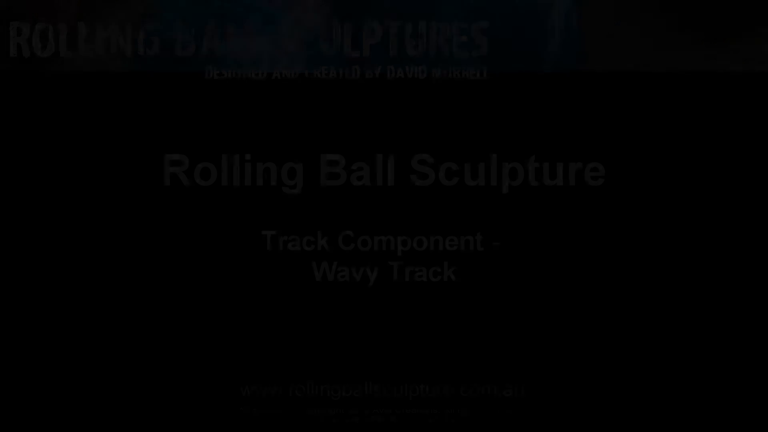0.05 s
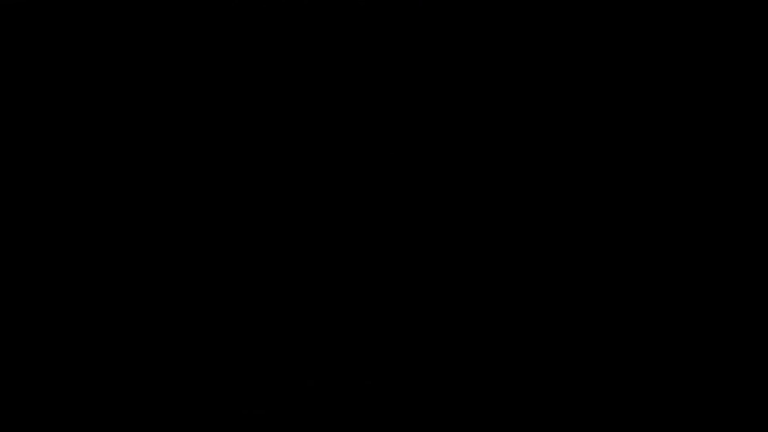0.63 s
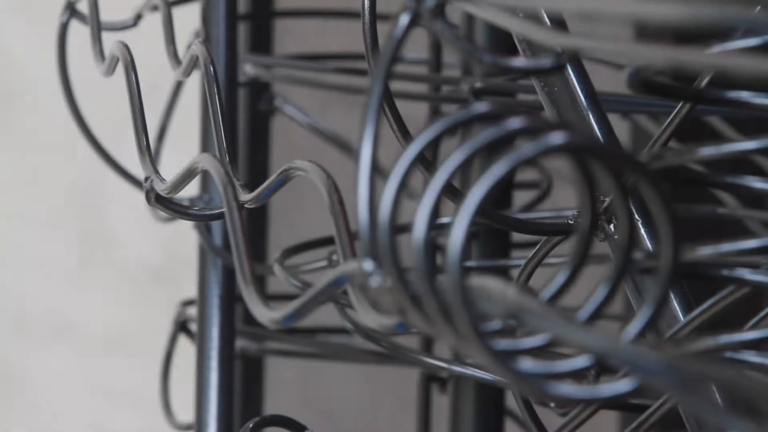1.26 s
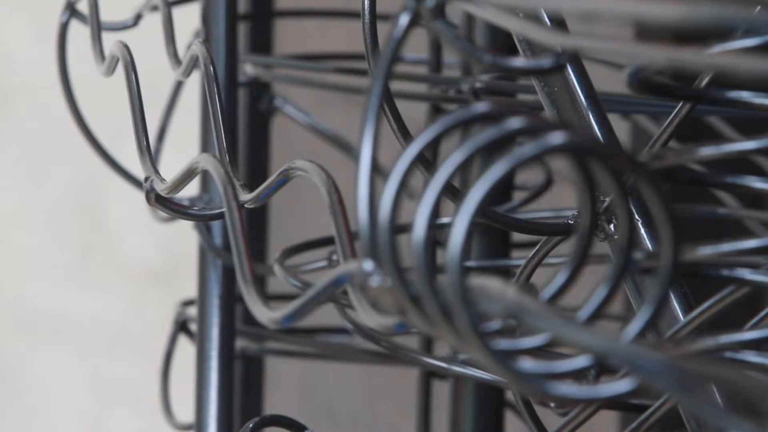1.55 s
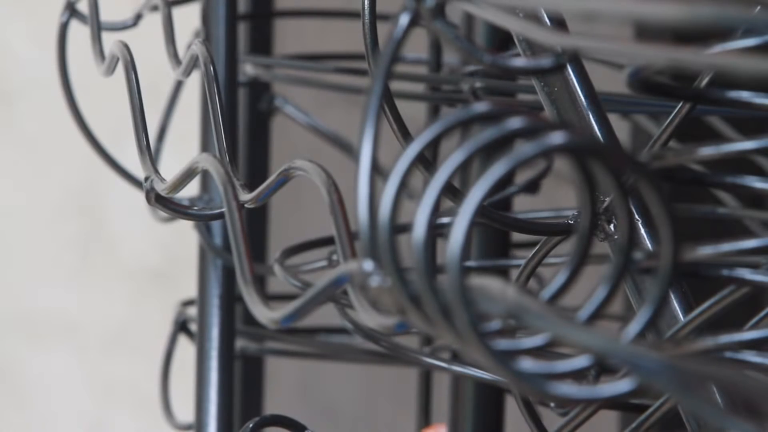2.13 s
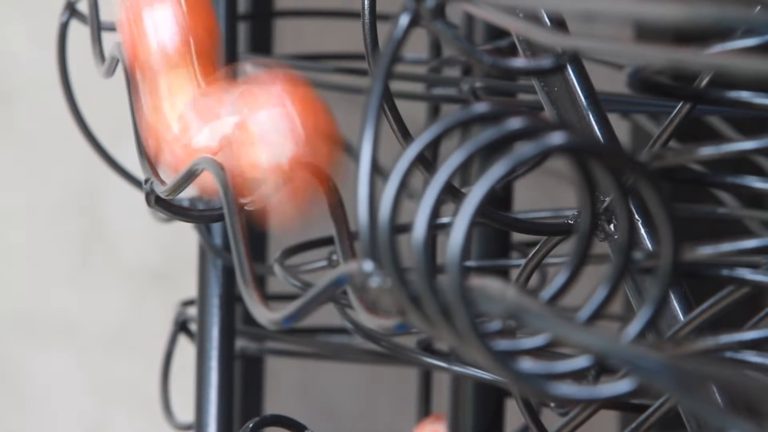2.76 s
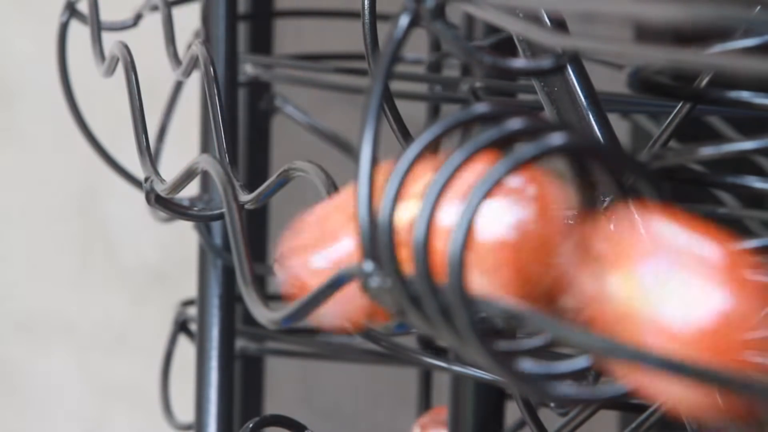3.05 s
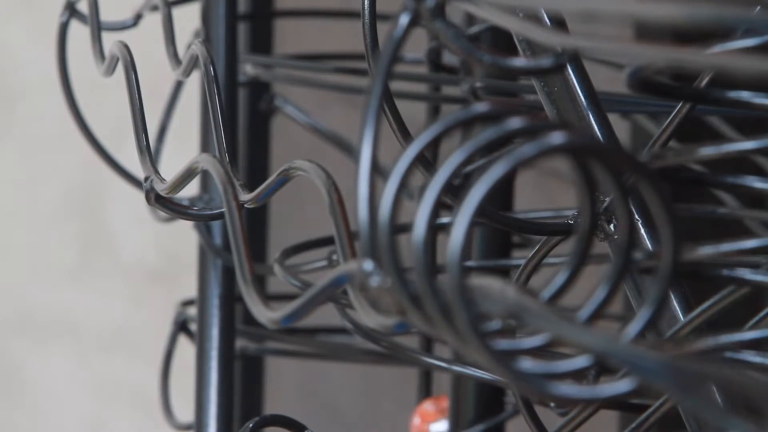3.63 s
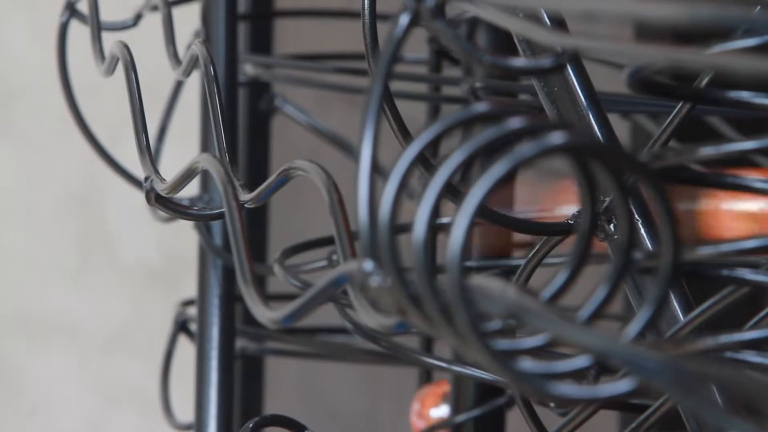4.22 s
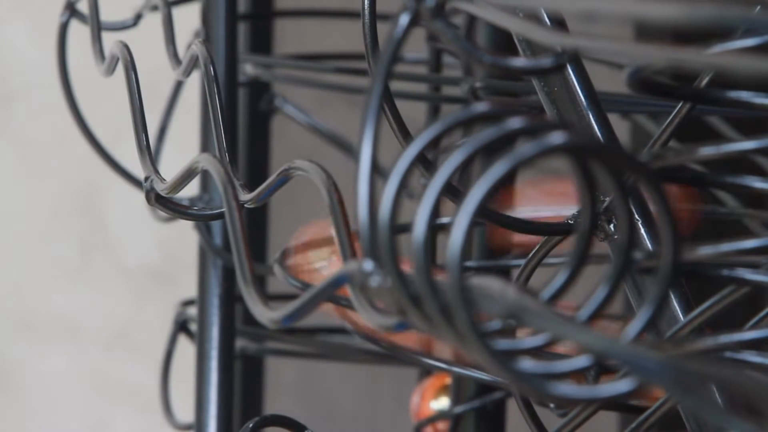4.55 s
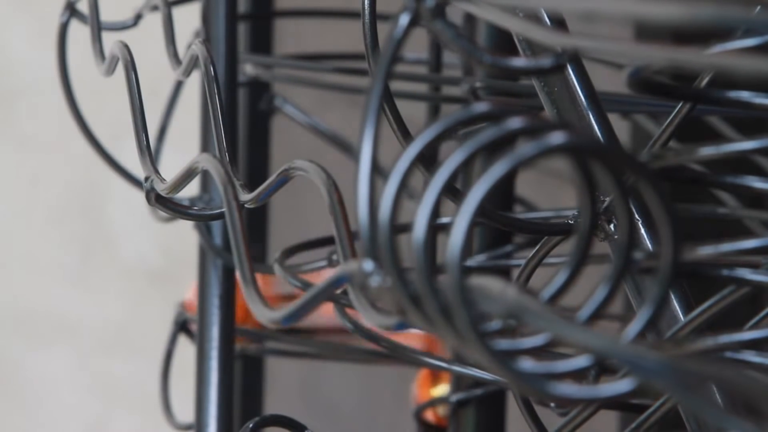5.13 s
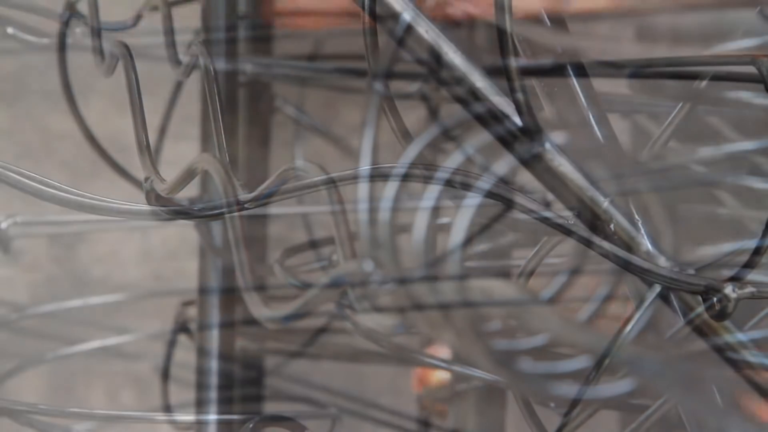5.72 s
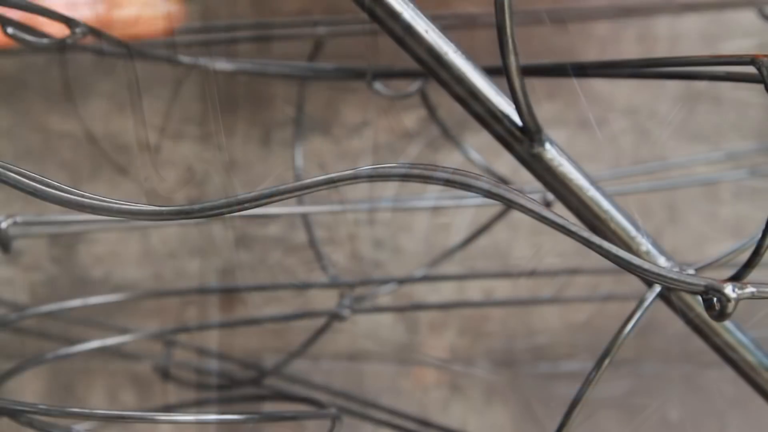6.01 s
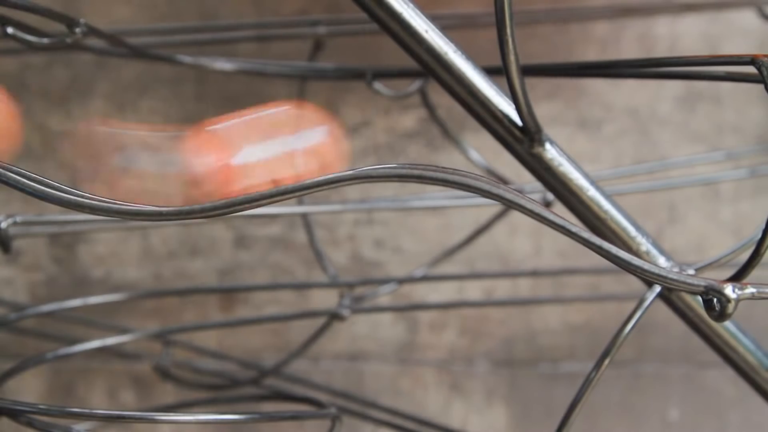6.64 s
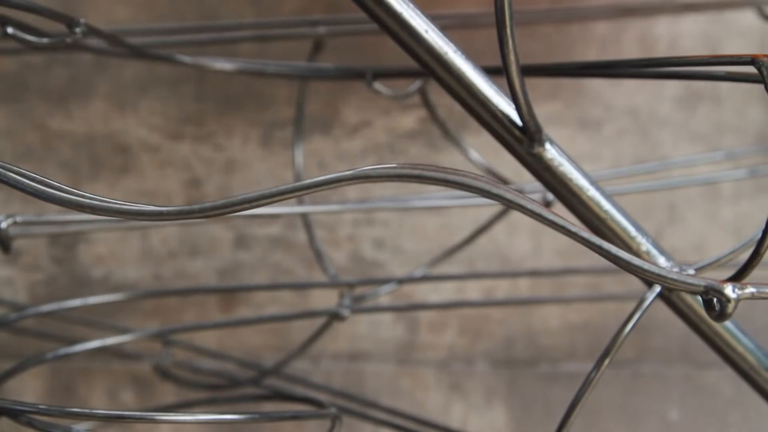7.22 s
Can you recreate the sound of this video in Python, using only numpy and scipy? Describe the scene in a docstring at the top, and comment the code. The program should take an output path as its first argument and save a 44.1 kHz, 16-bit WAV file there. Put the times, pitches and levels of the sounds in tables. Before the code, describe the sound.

Close, continuous metallic rolling of balls on wire rails, broken by buzzy rattles, a sharp clack and light ticks, ending with a low rumble.

```python
"""Beside a welded rolling-ball sculpture, one microphone close to its wire tracks. Balls roll down, and pits in
the wire shake the rails into a ringing hiss that brightens with speed. At joints and bends the balls chatter.
One hard clack, a few ticks and two small pings stand out. Late in the run the scene changes, crossfading to a
wavy stretch of track where the frame rumbles."""
import sys
import numpy as np
from scipy import signal
from scipy.fft import rfft, irfft
from scipy.io import wavfile
from scipy.ndimage import uniform_filter1d

SR = 44100
rng = np.random.default_rng(int(sys.argv[2]) if len(sys.argv) > 2 else 0)


def output_pcm(signal):
    """Save a mono or channel-first signal as 16-bit PCM at the path in sys.argv[1].

    Samples are clipped to [-1, 1] before scaling.
    """
    pcm = np.clip(np.atleast_2d(signal).T, -1, 1) * 32767
    wavfile.write(sys.argv[1], SR, np.round(pcm).astype(np.int16))


N = 329427
TIME = np.arange(N) / SR
START_S = 0.192
CROSSFADE_S = [5.38, 6.05]  # the scene changes from the first stretch of track to the wavy one


def amp(db):
    """Decibels to gain."""
    return 10 ** (np.asarray(db) / 20)


def unit(x):
    """Scales to rms 1."""
    return x / np.sqrt(np.mean(x ** 2) + 1e-20)


def log_interp(hz, knots, values):
    """Joins spectrum points on a log-frequency axis."""
    return np.interp(np.log(hz + 1), np.log(knots), values)


def add(mix, start_s, sound):
    """Mixes a sound in at start_s."""
    part = mix[round(start_s * SR):][:len(sound)]
    part += sound[:len(part)]


def tint(x, knots, levels_db, peaks=(), size=8192):
    """Causal filter from a smooth spectrum plus resonance peaks (Hz, width in Hz, dB)."""
    hz = abs(np.fft.fftfreq(size, 1 / SR))
    peaks_db = sum(db / (1 + (2 * (hz - centre) / width) ** 2) for centre, width, db in peaks)
    gain = amp(log_interp(hz, knots, levels_db) + peaks_db)
    minimum_phase = np.exp(np.conj(signal.hilbert(np.log(gain))))
    response = np.fft.ifft(minimum_phase).real
    return signal.oaconvolve(x, response[:size // 2])[:len(x)]


def band_db(x, lo_hz, hi_hz):
    """Rms level of one band."""
    hz = np.fft.rfftfreq(len(x), 1 / SR)
    band = rfft(x)[(hz > lo_hz) & (hz < hi_hz)]
    return 10 * np.log10(2 * np.sum(abs(band) ** 2) / len(x) ** 2)


def wander(per_s):
    """Random drift of rms 1 that takes a new value per_s times a second."""
    return unit(np.interp(TIME * per_s, np.arange(4096), rng.standard_normal(4096)))


def swell(t, at_s, spread_s):
    """A smooth bump of height 1."""
    return np.exp(-((t - at_s) / spread_s) ** 2)


def pits(per_s, spread_db, rubbing):
    """Contact force: tiny blows of uneven size over a smooth rubbing noise."""
    sizes = amp(spread_db * np.minimum(rng.exponential(1, N), 4))
    blows = sizes * rng.choice([-1, 1], N) * (rng.random(N) < per_s / SR)
    return unit(unit(blows) + rubbing * rng.standard_normal(N))


def wire_web(x, wet_db, t60, above_hz, size=16384):
    """Waves run on through the welded wires and come back as a thicket of fine, high modes."""
    t, hz = np.arange(size) / SR, np.fft.rfftfreq(size, 1 / SR)
    tail = rng.standard_normal(size) * amp(-60 * t / t60)
    wet = amp(wet_db) * hz ** 4 / (hz ** 4 + above_hz ** 4)
    response = irfft((1 + wet * rfft(tail / np.linalg.norm(tail))) / np.sqrt(1 + wet ** 2))
    lead = size // 64  # room for the filter's pre-ring
    return signal.oaconvolve(x, np.roll(response, lead))[lead:lead + N]


def ring(modes):
    """Struck modes dying away."""
    t = np.arange(SR) / SR
    return sum(amp(db - 60 * t / t60) * np.sin(2 * np.pi * hz * t) for hz, db, t60 in modes)


def frame_rumble():
    """Balls swinging through the wavy stretch shake the whole frame."""
    # The rumble's rise and fall. Each row: time in seconds, level in dB.
    levels = [(5.3, -62), (5.55, -39), (5.95, -29), (6.26, -37.5), (6.39, -33), (6.75, -30.5), (7.02, -33),
              (7.32, -44.5), (7.46, -37)]
    # The frame's low response. Each row: frequency in Hz, relative level in dB.
    colour = [(30, -37), (60, -36), (90, -21), (130, -4.5), (160, -2.5), (235, -4.5), (265, -1.5), (284, 5),
              (305, -12.5), (450, -8.5), (1000, -77)]
    force = pits(per_s=370, spread_db=-3.0, rubbing=0.45)
    shake = unit(tint(force, *np.transpose(colour)))
    return shake * amp(np.interp(TIME, *np.transpose(levels), left=-100))


def knocks():
    """Ball on ball cracks and rings; a ball on a short bar or a thin wire end only pings."""
    # Ball strikes ball. Each row: start in seconds, gain in dB, further gain of thud and ring in dB.
    clacks = [(0.4778, 2.5, -0.5), (0.6165, -12.5, -22), (1.5575, -7, -28), (2.9375, -5, -34),
              (3.190, -10, -32)]
    # Struck modes. Each row: frequency in Hz, relative level in dB, t60 in seconds.
    crack_modes = [(3900, -12, 0.005), (5670, 2.5, 0.003), (8700, -19, .018), (11100, -20, .012)]  # the brief crack itself
    body_modes = [(700, -10, .003), (2720, -44, .5), (5841, -28, 0.32), (8726, -21, 0.26),
                  (10420, -26, .16), (11100, -16.5, 0.28), (11800, -25, 0.36), (14500, -31, .5)]  # a dead thud and thin rings
    bar_modes = [(921, -5, .2), (1911, 0, .25), (5685, -5, .1), (9600, -6, .08), (10260, -9, .12)]
    wire_modes = [(6700, -4, .14), (9150, -1, .22), (9781, -6, .3), (14430, -3, .18)]
    out, t = np.zeros(N), np.arange(SR) / SR
    # The crack scatters along the wire as a short, bright spray.
    spray = unit(tint(rng.standard_normal(SR), [800, 4000, 12000, 16000], [-29, 0, 1, -10]))
    spray *= amp(-14.0 - 60 * t / 0.049)
    for start_s, db, body_db in clacks:
        add(out, start_s, amp(db) * (ring(crack_modes) + spray + amp(body_db) * ring(body_modes)))
    attack = np.minimum(t / 0.0014, 1)
    for start_s, db, modes in [(4.983, -14, bar_modes), (6.334, -21, wire_modes)]:
        add(out, start_s, amp(db) * ring(modes) * attack)
    return out


def chatter():
    """A ball jolted at a joint or bend bounces in a fast buzz of tiny blows, then settles."""
    # The jolts. Each row: start in seconds, level in dB, hold and t60 in seconds, bright share 0-1.
    jolts = [(0.365, -30.5, 0.03, .3, .4), (0.434, -23.5, .013, 0.12, 0.7), (0.479, -21, .006, 0.76, 0.54),
             (0.699, -17.5, 0.037, .21, 0.88), (0.752, -15.5, .02, 0.28, 0.93),
             (0.795, -18, 0.023, 0.21, 0.5), (0.86, -19.5, 0.13, .3, .4), (1.110, -23, .02, .38, .75),
             (1.344, -25.5, 0.036, .4, 0.36), (1.510, -21.5, .035, .3, 0.84),
             (1.55, -13.5, 0.006, 0.06, .3), (1.556, -15, .005, 0.43, 1), (1.656, -17.5, 0.018, .44, .87),
             (1.73, -22, .02, .12, .7), (1.838, -14, .018, 0.24, 0.8), (2.486, -19, .025, 0.5, .43),
             (2.848, -22.5, 0.051, 0.27, 0.4), (3.178, -24.5, 0.027, 0.3, .4), (3.580, -29, .02, .24, .5),
             (4.48, -21, 0.096, .2, 0.6), (4.821, -16, 0.014, .3, 0.7), (4.865, -21.5, .015, .2, .8),
             (4.913, -23, .02, 0.33, 0.7), (4.982, -16.5, 0.015, .17, 1), (5.07, -17, .022, .6, 1),
             (5.339, -20.5, .018, 0.31, .5), (5.550, -23.5, .076, .3, .4), (6.165, -19.5, .07, 0.18, .2),
             (6.435, -22.5, 0.043, .2, 0.5), (6.76, -26, .012, .2, .5), (6.825, -21.5, .04, .3, 0.3),
             (6.944, -16.5, 0.033, 0.46, 0.53), (7.063, -18.5, 0.051, .25, 0.5),
             (7.160, -21, 0.1, .2, 0.45)]
    # Soft and hard contact. Each row: frequency in Hz, dull and bright relative levels in dB.
    colours = [(100, -42, -46), (700, -9, -15), (1980, -11, -19), (4330, -1.5, -9.5), (8040, -1.5, -13),
               (10300, -2, -5.5), (11500, -16, -0.5), (14300, -25, -4.5), (16700, -30, -23)]
    dull_power, bright_power = np.zeros(N), np.zeros(N)
    t = np.arange(SR // 2) / SR
    for start_s, db, hold_s, t60, bright in jolts:
        attack = np.minimum(t / (0.058 * hold_s), 1)
        power = (attack * amp(db - 60 * np.maximum(t - hold_s, 0) / t60)) ** 2
        add(dull_power, start_s, power * (1 - bright))
        add(bright_power, start_s, power * bright)
    knots, dull_db, bright_db = np.transpose(colours)
    buzz = np.zeros(N)
    for power, colour_db in [(dull_power, dull_db), (bright_power, bright_db)]:
        force = pits(per_s=3000, spread_db=2.0, rubbing=0.66)
        force = wire_web(force, wet_db=-3, t60=0.11, above_hz=1100)
        buzz += np.sqrt(power) * unit(tint(force, knots, colour_db))
    return buzz


def ringing_rails():
    """Pits in the wire ring the rails and their frame; the scene then changes from the first stretch to the
    wavy one."""
    # The track's tone. Each row: frequency in Hz, relative dB on the first and on the wavy stretch.
    colours = [(30.0, -40, -39), (80.0, -31, -29), (156, -26, -13), (247, -26.5, -25), (374, -23.5, -26),
               (687, -13.5, -17.5), (1214, -5, -7), (2250, -3.0, 0), (3050, -1, -7), (4780, 0.5, -3.5),
               (7400, -3, -5.5), (12000.0, -4, -8.5), (13900, -10, -13), (15300, -17.5, -18.0)]
    # Resonances of the frame and of each stretch. Each row: centre in Hz, width in Hz, lift in dB.
    frame_modes = [(365, 130, 13), (508, 100, 13), (605, 70, 14.5), (775, 45, 6.5), (918, 105, 9.5)]
    first_modes = [(1063, 59, 6.5), (1280, 183, 10.5), (1520, 145, 6), (1681, 204, 9), (1852, 15, 8),
                   (1922, 42, 12), (2032, 144, 11.5), (2150, 116, 4), (2299, 73, 8), (2378, 24, 10),
                   (2527, 39, 6), (2577, 93, 6.5), (2690, 5.4, 5), (2738, 9, 15.5), (2836, 22, 3.5),
                   (3010, 390, 3), (3533, 120, 4.5), (3930, 26.0, -2), (4000, 82, 6), (4290, 92, 6.5),
                   (4500, 35, -1), (5723, 68, 7), (6370, 64, 5.5), (8630, 20.0, 8), (9450, 85, 7.5)]
    wavy_modes = [(1073, 87, 6), (1237, 146, 8.5), (1600, 60, 6.5), (1968, 19, 9), (2082, 193, 9.5),
                  (2425, 125, 7), (2620, 160, 4.5), (2780, 28, 8.5), (3030, 33, 9), (3340, 170, 8),
                  (3600, 140, 6.5), (3860, 150.0, 3), (4250, 230, 6), (4280, 30.0, -2), (4740, 95, 3),
                  (4770, 27.0, 3), (5530, 38.0, 0), (5615.0, 19, 12.5), (6140, 27, 0), (6170, 22.0, 9),
                  (8830, 150.0, 7.5), (9800, 150.0, 5), (10100, 24.0, 3), (10901.0, 18, 3),
                  (11160, 104.0, 8)]
    force = pits(per_s=2600, spread_db=1.5, rubbing=0.73) * amp(0.4 * wander(per_s=45))
    force = wire_web(force, wet_db=-3, t60=.5, above_hz=3400)
    knots, first_db, wavy_db = np.transpose(colours)
    first = unit(tint(force, knots, first_db, [*frame_modes, *first_modes]))
    wavy = unit(tint(force, knots, wavy_db, [*frame_modes, *wavy_modes]))
    wavy_share = np.interp(TIME, CROSSFADE_S, [0, 1])
    return (1 - wavy_share) * first + wavy_share * wavy


def resonance_drift_db(hz, t):
    """Lift by frequency and time: two rings of the wire and the frame's hum change along the run."""
    def band(centre_hz, half_width_hz, lift_db):
        return np.outer(1 / (1 + ((hz - centre_hz) / half_width_hz) ** 2), lift_db)

    # The main ring is weak at the top of the track and fills in as the balls run down.
    main_db = np.interp(t, CROSSFADE_S, [1, 0.6]) - 8 * np.exp(-(t - START_S) / 0.75)
    # The higher ring swells once, through the bends and the coil; the hum sinks in mid-run.
    coil_db = np.interp(t, CROSSFADE_S, [-1.05, .7]) + 4.5 * swell(t, at_s=2.4, spread_s=0.88)
    hum_db = 1.5 - 3 * swell(t, at_s=3.4, spread_s=1.7)
    return band(2030, 116, main_db) + band(4530, 380, coil_db) + band(490, 180, hum_db)


def rolling():
    """Balls run down the rails; a faster, harder contact is louder and tilts the hiss upwards."""
    # Speed over the slopes, given as how loudly the rails ring. Each row: time in seconds, level in dB.
    pace = [(0.33, -32.5), (0.45, -28), (0.68, -31.5), (0.72, -26), (0.96, -22.5), (1.22, -26.5),
            (1.6, -24.5), (1.7, -21.5), (1.82, -26), (1.86, -22), (2.32, -23), (2.46, -25), (2.79, -23),
            (2.9, -22), (3.17, -21.5), (3.78, -27), (4.15, -23), (4.39, -19.5), (4.7, -22.5), (4.93, -20),
            (5.04, -22.5), (5.18, -20.5), (5.4, -25.5), (5.75, -20.5), (5.92, -22.5), (6.16, -20),
            (6.46, -22), (7.24, -21.5), (7.33, -23)]
    cruise_db, crawl_db = -22, -26
    rails = ringing_rails()
    hz, t, spectrum = signal.stft(rails, SR, nperseg=512)
    # The balls rock between the two rails, so the pace is never quite even.
    rocking_db = 0.48 * np.interp(t, TIME, wander(per_s=15))
    pace_db = np.interp(t, *np.transpose(pace)) + rocking_db
    softening_db = 0.74 * np.maximum(crawl_db - pace_db, 0)  # below a crawl the contact softens
    hiss_db = -23.5 + 1.37 * (pace_db - cruise_db) - softening_db
    ring_gain_db = pace_db - band_db(rails, 900, 3000)
    bright_db = hiss_db - band_db(rails, 4500, 14000) - ring_gain_db
    # The higher the band, the more it depends on speed.
    follow = log_interp(hz, [150, 650], [.4, 1])
    tilt = log_interp(hz, [2260, 5400, 9000, 14000], [0, .7, 1.15, 1.6])
    gain_db = np.outer(follow, ring_gain_db) + np.outer(tilt, bright_db) + resonance_drift_db(hz, t)
    # Each band swells and fades at random, as modes do when a ball crosses their nodes.
    flicker = uniform_filter1d(rng.standard_normal(spectrum.shape[::-1]), size=16, axis=0)
    gain_db += 1.45 * unit(flicker).T
    return signal.istft(spectrum * amp(gain_db), SR, nperseg=512)[1][:N]


def scene():
    """Everything reaches one close microphone; both channels carry it."""
    mono = rolling() + chatter() + knocks() + frame_rumble()
    return np.array([mono, mono])


def record(dry):
    """The microphone opens after a moment, overloads at full scale and loses the highest treble."""
    opened = dry * np.clip((TIME - START_S) / .006, 0, 1)
    clipped = np.clip(opened, -1, 1)
    lowpass = signal.firwin(1023, cutoff=15750, window=("kaiser", 9), fs=SR)
    return signal.oaconvolve(clipped, lowpass[None], "same")


dry = scene()
out = record(dry)
output_pcm(out)
```